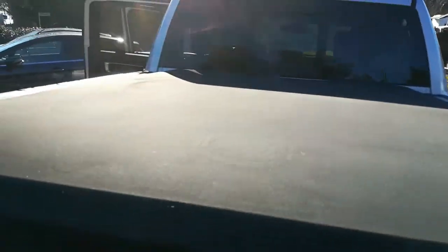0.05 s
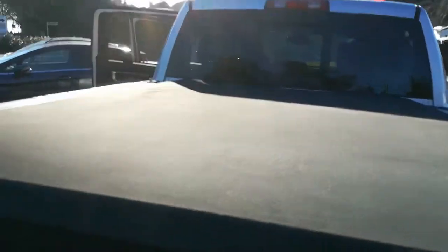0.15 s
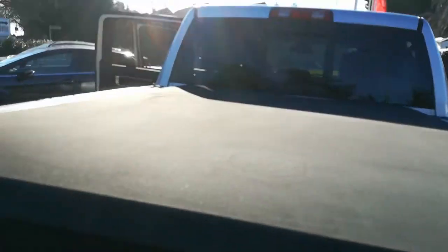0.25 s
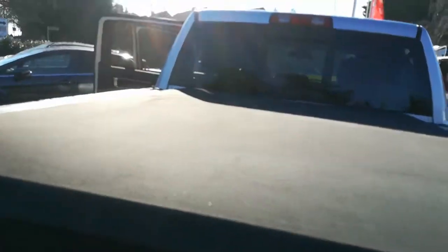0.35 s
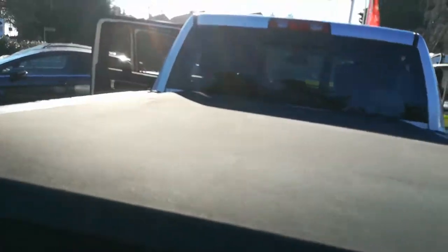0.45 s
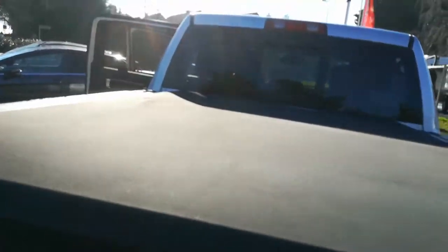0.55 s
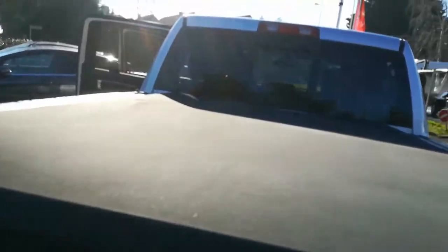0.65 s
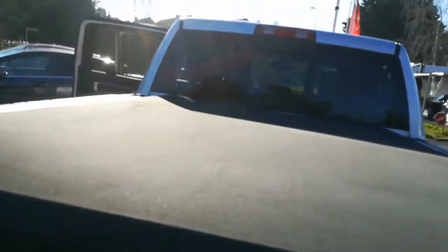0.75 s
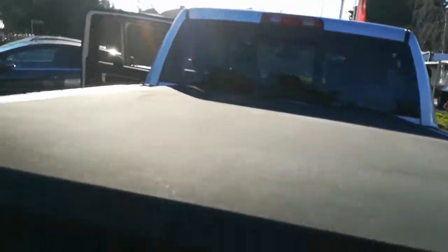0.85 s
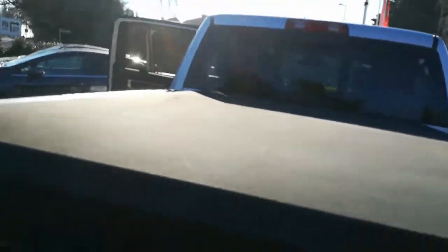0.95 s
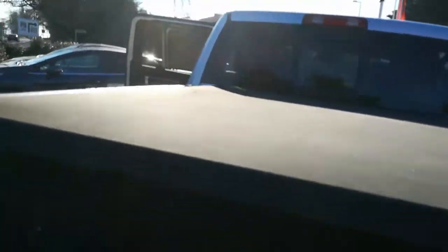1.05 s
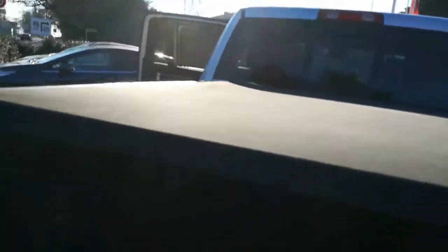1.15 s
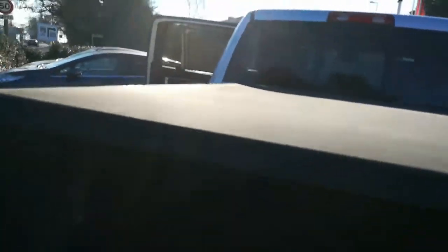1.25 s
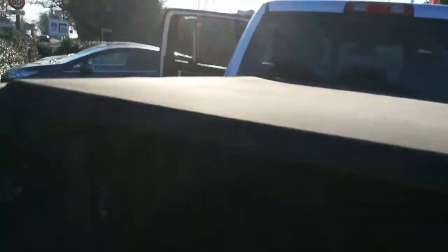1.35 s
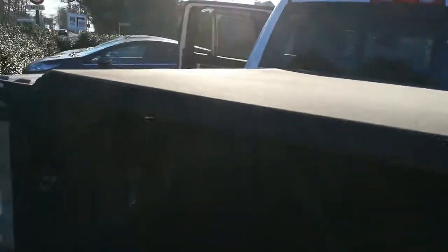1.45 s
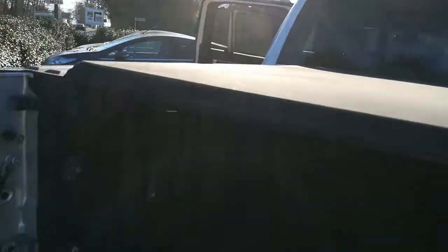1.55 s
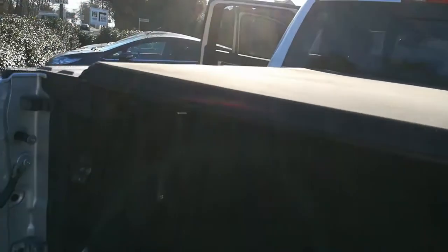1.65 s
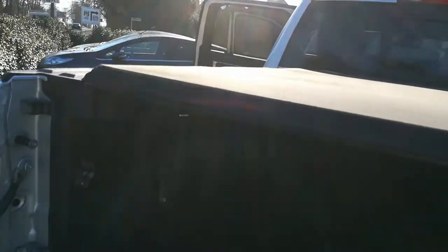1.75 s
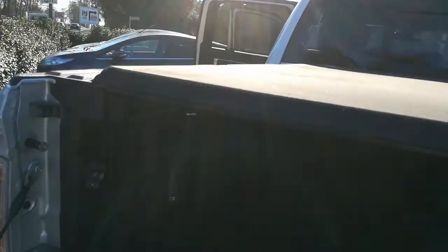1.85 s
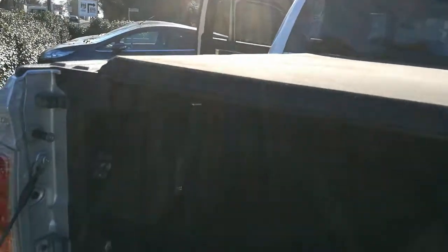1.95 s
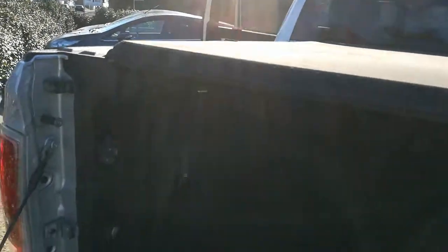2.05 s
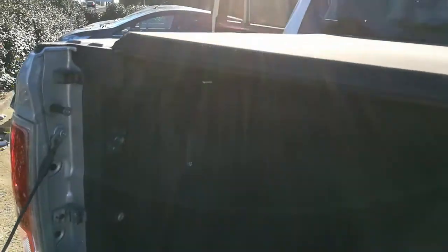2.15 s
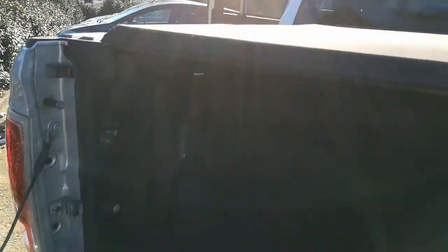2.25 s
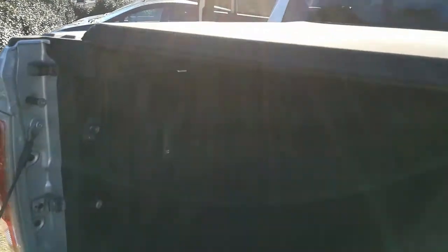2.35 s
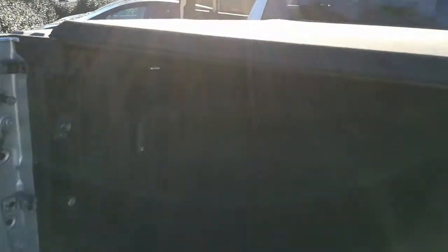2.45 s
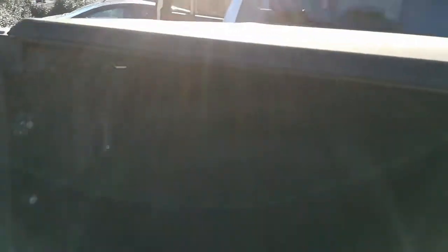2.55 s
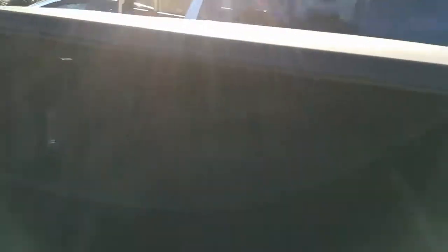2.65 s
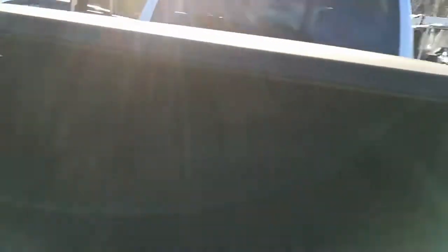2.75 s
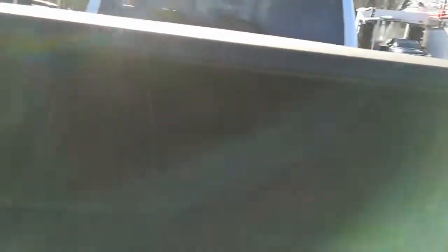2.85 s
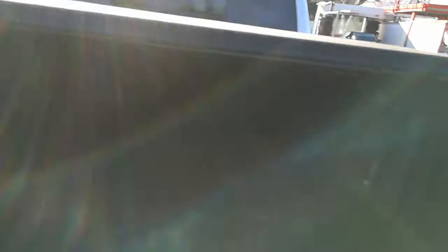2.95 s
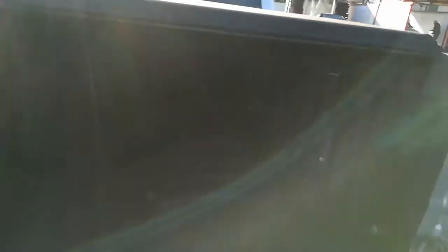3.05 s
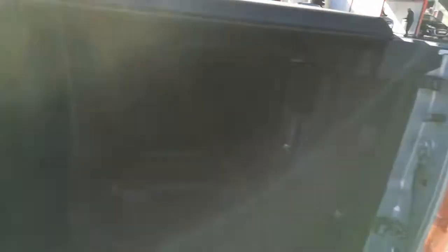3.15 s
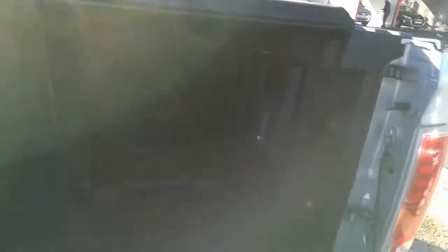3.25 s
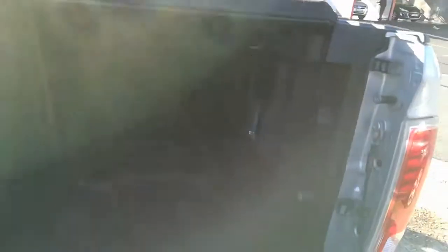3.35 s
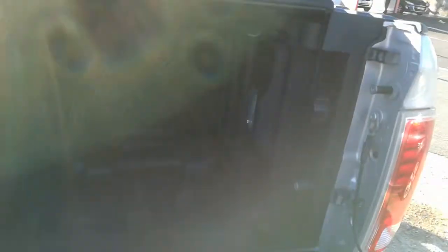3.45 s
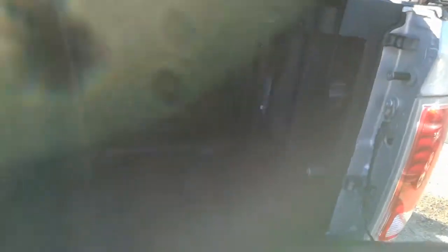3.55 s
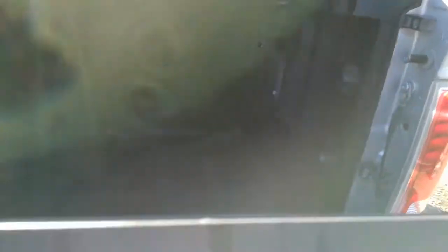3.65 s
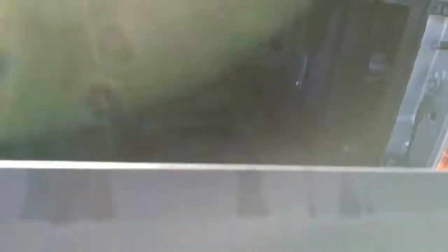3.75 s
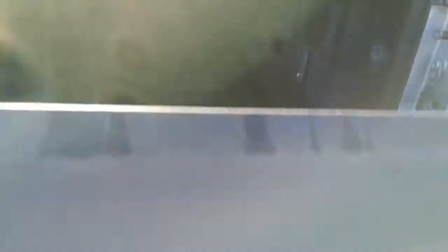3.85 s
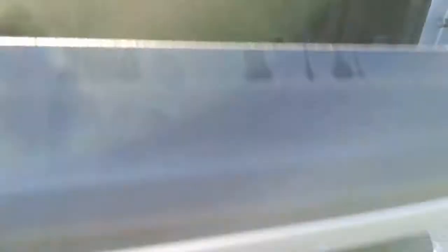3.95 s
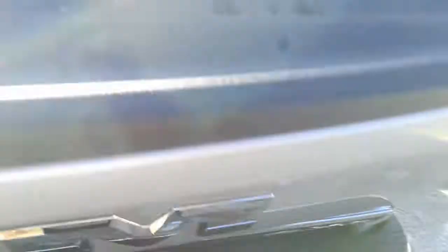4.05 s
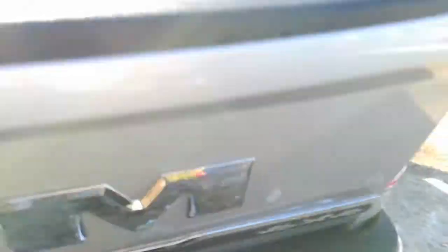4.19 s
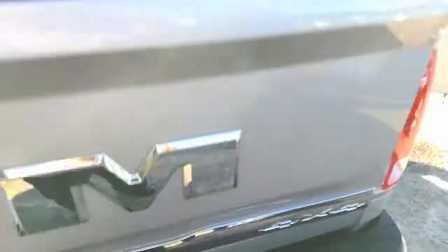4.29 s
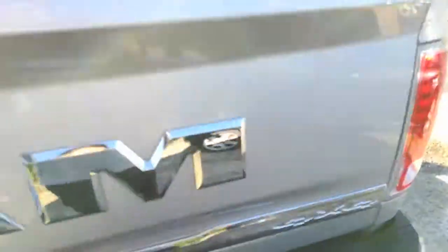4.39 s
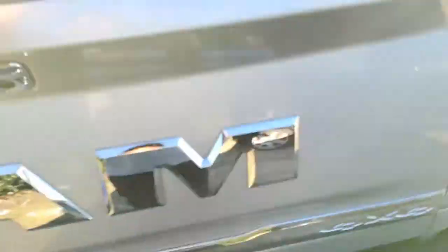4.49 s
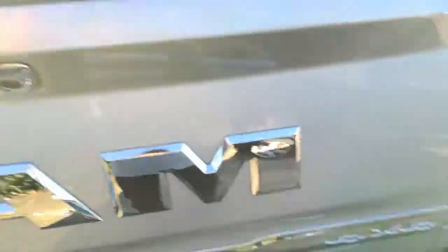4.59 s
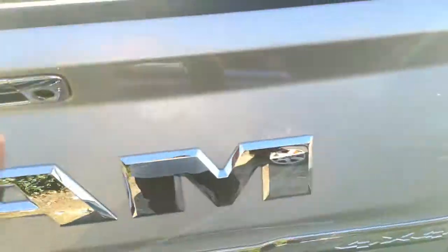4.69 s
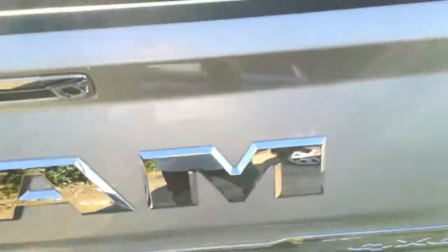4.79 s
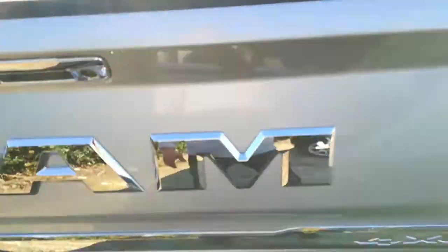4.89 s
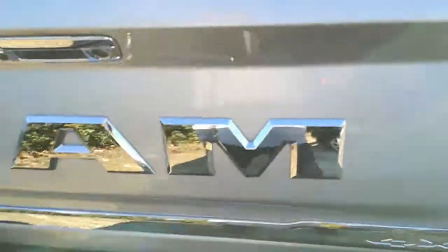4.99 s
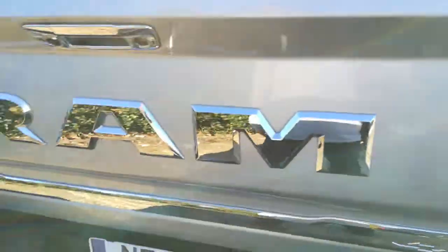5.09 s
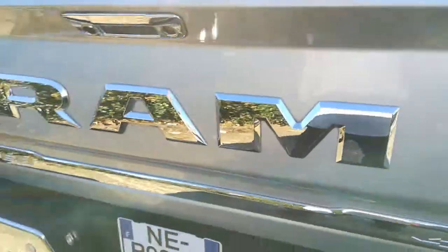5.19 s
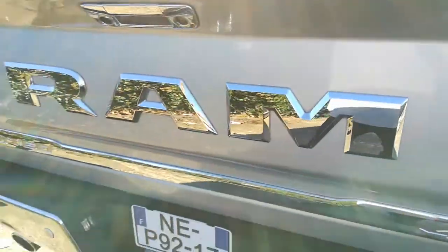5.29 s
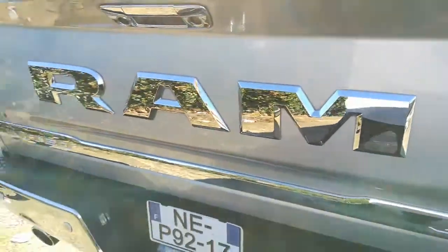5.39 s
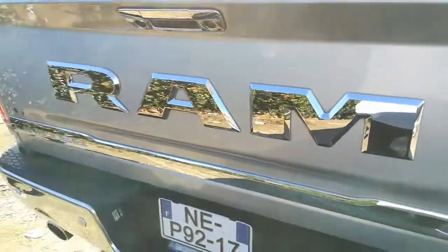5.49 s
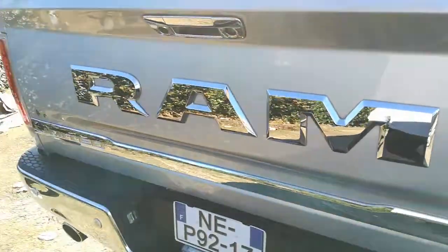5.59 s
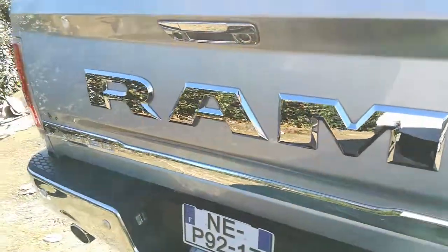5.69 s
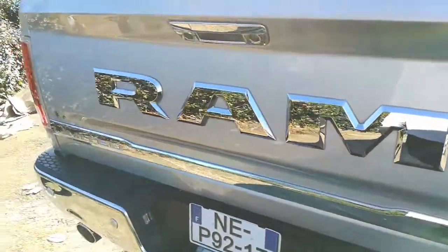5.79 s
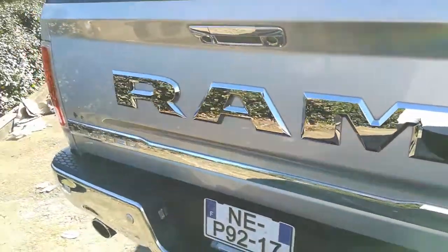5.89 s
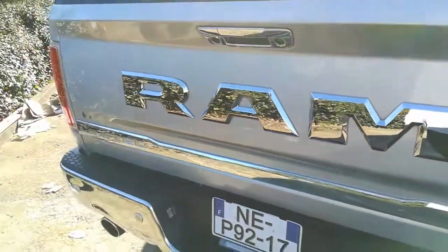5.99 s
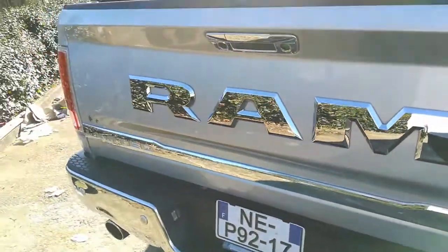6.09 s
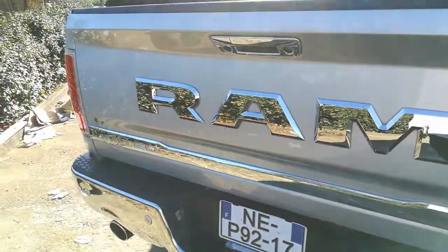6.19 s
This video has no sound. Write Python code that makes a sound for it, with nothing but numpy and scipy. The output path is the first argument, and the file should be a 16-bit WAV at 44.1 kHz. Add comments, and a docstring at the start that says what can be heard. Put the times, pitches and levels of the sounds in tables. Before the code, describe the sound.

A handheld microphone stands right behind a parked truck in open air. For over four seconds there is only faint traffic, hiss, leaf rustle and wind buffeting, then a barely audible hinge scrape and tick. The heavy steel tailgate bangs shut very loudly, its latches cracking in quick succession, panels thudding and ringing briefly. Half a second later the handle clicks lightly, and soft road noise remains.

```python
"""Traffic rumble, tyre roar and airy hiss are heard first, with light gusts, a rustling hedge and a distant
engine whose note climbs slowly. A soft hinge scrape and a faint click lead to the slam of a pickup's tailgate:
stops and latches crack and clatter as noise bursts, steel panels thud and ring as damped modes, and the covered
bed booms as a short low swing. A small click follows.
The background is shaped noise; the engine is a wavering sum of three harmonics."""
import sys
import numpy as np
from scipy import signal
from scipy.fft import rfft, irfft, next_fast_len
from scipy.io import wavfile
from scipy.ndimage import uniform_filter1d, map_coordinates

SR = 44100
rng = np.random.default_rng(int(sys.argv[2]) if len(sys.argv) > 2 else 0)


def waveform_to_disk(signal):
    """Save audio, clipped to [-1, 1], as 16-bit WAV at the path in sys.argv[1]."""
    frames = np.transpose(np.atleast_2d(signal))
    scaled = np.clip(frames, -1, 1) * 32767
    samples = np.round(scaled).astype(np.int16)
    wavfile.write(sys.argv[1], SR, samples)


N = 274743
TIME = np.arange(N) / SR  # s, from the start of the scene
AGE = np.arange(SR) / SR  # s, from the start of a single hit


def amp(db):
    """Level: decibels become an amplitude ratio."""
    return 10 ** (np.asarray(db) / 20)


def unit(x):
    """Normalisation: scale to rms 1."""
    return x / np.sqrt(np.mean(x ** 2) + 1e-20)


def along(points, hz):
    """Logarithmic pitch: read a (frequency, value) curve on a log frequency axis."""
    point_hz, value = np.transpose(points)
    return np.interp(np.log(hz + 1), np.log(point_hz + 1), value)


def curves(rows):
    """Linear interpolation: one value per sample for each column after the time."""
    s, *columns = np.transpose(rows)
    return [np.interp(TIME, s, column) for column in columns]


def wobble(rate, size=N):
    """Random modulation: a smooth curve through random knots, rate of them a second."""
    knots = rng.standard_normal(int(size * rate / SR) + 4)
    return map_coordinates(knots, [TIME[:size] * rate])


def swell(s, half_s):
    """Gaussian envelope: a smooth rise and fall that peaks at time s."""
    return np.exp(-((TIME - s) / half_s) ** 2)


def filtered(x, response):
    """Linear filtering: multiply the spectrum of x by a response of frequency."""
    length = x.shape[-1]
    padded = next_fast_len(length + 8192)
    spectrum = rfft(x, padded) * response(np.fft.rfftfreq(padded, 1 / SR))
    return irfft(spectrum, padded)[..., :length]


def reshaped(x, gain):
    """Time-varying filtering: a gain over frequency and time on the short-time spectrum."""
    hz, t, cells = signal.stft(x, SR, nperseg=256)
    return signal.istft(cells * gain(hz, t), SR)[1][:, :x.shape[1]]


# Correlation of the left and right sound: pitch_hz, correlation (1 is identical, 0 is unrelated)
STEREO_CORRELATION = [(70, 0.98), (160, 0.99), (300, 0.71), (600, 0.033), (1200, 0.13), (2500, 0.0082),
                      (10000, 0.022)]


def noise(spectrum, size):
    """Diffuse-field coherence: coloured noise of rms 1, alike in the bass, nearly unrelated in the treble."""
    def mid_side_response(hz):
        angle = np.arccos(np.clip(along(STEREO_CORRELATION, hz), -1, 1)) / 2
        return amp(along(spectrum, hz)) * [np.cos(angle), np.sin(angle)]

    mid, side = filtered(rng.standard_normal((2, size)), mid_side_response)
    return unit(np.array([mid + side, mid - side]))


def ring(modes, scatter_db, spread_hz):
    """Modal superposition: decaying sines of varied strength, the higher ones out of step left to right."""
    out = np.zeros((2, SR))
    for hz, db, t60 in modes:
        skew = rng.normal() * min(hz / spread_hz, 1) * np.array([[1], [-1]])  # rad
        decay = amp(db + scatter_db * rng.normal() - 60 * AGE / t60)
        out -= decay * np.sin(2 * np.pi * hz * AGE + skew)
    return out


def add(track, s, sound, pan_db=0):
    """Superposition: mix a sound in at time s, pan_db louder on the left than on the right."""
    start = round(s * SR)
    panned = sound * amp([[pan_db / 2], [-pan_db / 2]])
    track[:, start:start + SR] += panned[:, :N - start]


# Metal contacts of stops and latches: start_s, crack_level_db, crack_t60_s, clatter_level_db,
# dull_above_hz, left_over_right_db
METAL_CONTACTS = [(4.362, -12, 0.032, -19.5, 4530, -5), (4.3672, -6, 0.019, -24, 6400, 11.5),
                  (4.3855, -14, 0.032, -19.5, 16000, -4.5), (4.401, -8.5, 0.034, -21.5, 14900, 7.5),
                  (4.4194, -19, 0.031, -27.5, 4500, -11), (4.458, -29, 0.062, -31, 11000, -3),
                  (4.503, -21.5, 0.044, -30, 4200, -2), (4.5602, -31, 0.0044, -62, 14000, -15),
                  (4.571, -42, .03, -40.5, 2400, -9), (4.692, -44, .025, -57, 13900, -7)]
# Colour of the sharp crack: pitch_hz, density_db (per Hz)
CRACK_SPECTRUM = [(200, -5), (500, 4), (700, -32), (1000, -1), (2200, 1), (3200, -17), (4300, 2),
                  (6500, -1.5), (9000, -10.5), (15000, -11)]
# Colour of the sheet-metal clatter: pitch_hz, density_db (per Hz)
CLATTER_SPECTRUM = [(60, -10), (150, 5), (350, -0.5), (520, -5), (700, -5.5), (950, 5), (1500, -4.5),
                    (2400, 2), (3300, -2), (5200, -4.5), (8000, -6), (15000, -21)]
# Decay time of the sheet metal: pitch_hz, t60_s
CLATTER_DECAY = [(100, 0.91), (400, 0.51), (1000, 0.33), (2500, 0.3), (6000, 0.2), (14000, 0.095)]


def latches(rattle_db=2.0):
    """Impact excitation: each contact is a sharp crack with a clatter of countless sheet-metal modes."""
    def steel_damping(hz, t):
        return amp(-60 * t / along(CLATTER_DECAY, hz)[:, None])

    out = np.zeros((2, N))
    onset = 1 - np.exp(-AGE / 0.0009)
    for s, crack_db, crack_t60, clatter_db, dull_hz, pan_db in METAL_CONTACTS:
        crack = amp(crack_db - 60 * AGE / crack_t60) * noise(CRACK_SPECTRUM, size=SR)
        chatter = unit(amp(rattle_db * wobble(300, size=SR)))  # loose parts buzz against each other
        sheet = reshaped(noise(CLATTER_SPECTRUM, size=SR), steel_damping)
        clatter = amp(clatter_db) * chatter * sheet
        # third-order roll-off of the treble
        softened = filtered(crack + clatter, lambda hz: 1 / np.sqrt(1 + (hz / dull_hz) ** 6))
        add(out, s, softened * onset, pan_db)
    return out


# Blows that shake the panels: start_s, ring_level_db, thud_level_db
PANEL_BLOWS = [(4.3615, -14.5, -38), (4.401, -19.5, -19), (4.4208, -19, -13), (4.501, -29.5, -20.5),
               (4.556, -34.5, -23), (4.66, -45, -35.5)]
# Modes of gate and bed: pitch_hz, level_db (relative to the ring level), t60_s
PANEL_MODES = [(92.9, -4, 0.62), (115.2, 7.5, 0.15), (151.3, -7, 0.447), (167.1, -2.5, 0.57),
               (214.4, -5, .42), (235, -14.5, 0.52), (267, -6.5, 0.34), (282.6, -8, 0.33),
               (305.6, -7.5, 0.28), (354.7, -14, .38), (383.6, -14.5, 0.49), (446.6, -15, 0.44),
               (483, -19, .4), (894, -16, .33), (986, -16, 0.26), (1194, -16, 0.24), (1260, -17, 0.17),
               (2200, -25, 0.23), (2454, -14.5, 0.18), (3740, -28, 0.18), (4300, -17, 0.17),
               (5070, -17, .22)]
# Colour of the body thud: pitch_hz, density_db (per Hz)
THUD_SPECTRUM = [(40, -16), (85, -3), (135, 4), (175, 2), (230, -5), (380, -9.5), (600, -33), (1500, -46)]


def panels(thud_t60=0.16):
    """Modal resonance: the weight of the gate thuds into the body and sets the big panels ringing."""
    out = np.zeros((2, N))
    onset = 1 - np.exp(-AGE / 0.0025)
    for s, ring_db, thud_db in PANEL_BLOWS:
        thud = amp(thud_db - 60 * AGE / thud_t60) * noise(THUD_SPECTRUM, size=SR)
        tone = amp(ring_db) * ring(PANEL_MODES, scatter_db=0.5, spread_hz=1200)
        add(out, s, (thud + tone) * onset)
    return out


COVER_HZ, COVER_SWELL_S = 46.5, 0.016  # swing of the soft cover, time to its widest
# The gate shoves the air in the bed as it latches and as it settles: start_s, level_db
AIR_SHOVES = [(4.401, -9.5), (4.557, -21.5)]


def boom():
    """Cavity resonance: air trapped in the bed pumps the soft cover, which swells and soon dies away."""
    out = np.zeros((2, N))
    u = AGE / COVER_SWELL_S
    envelope = u * np.exp(1 - u)
    swing = -envelope * np.cos(2 * np.pi * COVER_HZ * AGE)
    for s, db in AIR_SHOVES:
        add(out, s, amp(db) * swing)
    return out


# Small clicks of the handle: start_s, level_db, left_over_right_db
HANDLE_CLICKS = [(3.764, -41, -2), (5.0346, -20, 1), (5.0424, -30.5, -8)]
# Modes of the handle: pitch_hz, level_db (relative), t60_s
HANDLE_MODES = [(1260, -8, 0.026), (1730, -4, 0.023), (2320, -4, 0.033), (2470, -6.5, 0.046),
                (2590, -8, 0.067), (2880, -25, 0.052), (2950, -12.5, 0.08), (3620, -16, 0.074),
                (5300, -16, .03)]
# Colour of the tick: pitch_hz, density_db (per Hz)
TICK_SPECTRUM = [(300, -33), (700, -32), (1200, 6), (1900, -5), (2550, 8), (3600, -6), (6500, -12),
                 (9000, -17), (15000, -36)]


def handle(tick_db=-2, tick_t60=0.013, echo_db=-21, echo_t60=0.13, ring_db=-5):
    """Two-stage decay: a light plastic part ticks and rings, and the hollow gate answers faintly."""
    out = np.zeros((2, N))
    for s, db, pan_db in HANDLE_CLICKS:
        decay = amp(tick_db - 60 * AGE / tick_t60) + amp(echo_db - 60 * AGE / echo_t60)
        tick = decay * noise(TICK_SPECTRUM, size=SR)
        tone = amp(ring_db) * ring(HANDLE_MODES, scatter_db=1.0, spread_hz=1800)
        add(out, s, amp(db) * (tick + tone), pan_db)
    return out


# Colour of the hinge scrape: pitch_hz, density_db (per Hz)
SCUFF_SPECTRUM = [(800, -28), (2000, -10), (2450, -3), (2900, -10), (4500, -29), (12000, -45)]


def scuff(s=3.52, half_s=0.047, db=-51):
    """Friction noise: the hinge scrapes softly as the gate starts to lift."""
    return amp(db) * swell(s, half_s) * noise(SCUFF_SPECTRUM, size=N)


# Distant engine: start_s, pitch_hz (firing rate), level_db
ENGINE_COURSE = [(0, 72.32, -49.5), (.7, 73.15, -56.5), (1.3, 75, -50.5), (2.6, 81.42, -46.5),
                 (3.15, 85.74, -50.5), (3.7, 86.7, -48.5), (4.8, 90, -53), (5.75, 90.73, -50),
                 (6.23, 85, -71)]


def engine(waver_db=2.0):
    """Harmonic series: an exhaust note of three partials climbs slowly, wavers, and sinks at the end."""
    hz, db = curves(ENGINE_COURSE)
    phase = 2 * np.pi * np.cumsum(hz * (1 + 0.01516 * wobble(11))) / SR
    level = amp(db + waver_db * wobble(7.9)) * np.sqrt(2)  # the fundamental's rms follows db
    return level * (np.sin(phase) + amp(-12.5) * np.sin(2 * phase) + amp(-14.0) * np.sin(3 * phase))


CALM_DB = -52.5  # buffeting between gusts
RUSTLE_DB, RUSTLE_CALM_DB = -53.5, -62.5  # the hedge while the breeze blows, and after it drops
BREEZE_DROPS_S, BREEZE_DROP_LENGTH_S = 1.3, 0.19
# Gusts on the listener: peak_s, half_length_s, level_db
GUST_SWELLS = [(1.285, 0.21, -41), (5.194, .3, -55), (6.12, 0.068, -51.5)]
# Colour of the wind buffeting: pitch_hz, density_db (per Hz)
BUFFET_SPECTRUM = [(12, -18), (28, 4), (70, 6), (120, -7), (300, -32), (800, -75)]
# Colour of the hedge: pitch_hz, density_db (per Hz)
RUSTLE_SPECTRUM = [(500, -17), (1200, -2), (1800, 4.5), (2800, -1), (4000, 6.5), (5200, -12), (9000, -12.5),
                   (15000, -22)]


def breeze():
    """Turbulence noise: weak gusts buffet the listener; the hedge rustles until the breeze drops."""
    push = amp(CALM_DB) + sum(amp(db) * swell(s, half_s) for s, half_s, db in GUST_SWELLS)
    eddies = amp(1.5 * wobble(10))
    blowing = (1 - np.tanh((TIME - BREEZE_DROPS_S) / BREEZE_DROP_LENGTH_S)) / 2
    rustle_db = RUSTLE_CALM_DB + (RUSTLE_DB - RUSTLE_CALM_DB) * blowing
    buffeting = push * eddies * noise(BUFFET_SPECTRUM, size=N)
    return buffeting + amp(rustle_db) * noise(RUSTLE_SPECTRUM, size=N)


def patchy(x, depth_db):
    """Spectral fluctuation: slow random patches of colour drift through a steady noise."""
    def patches(hz, t):
        field = rng.standard_normal((len(hz), len(t)))
        across_pitch = uniform_filter1d(field, size=5, axis=0)
        return amp(depth_db * unit(uniform_filter1d(across_pitch, size=90, axis=1)))

    return reshaped(x, patches)


MIRROR_GROWTH_PER_S = 0.073  # the reflection strengthens as the listener nears the tailgate
# Extra path of the road noise by way of the truck's panels: time_s, path_m
REFLECTION_PATH = [(2.4, 0.28), (3.2, .35), (4.1, 0.23), (4.8, .35), (5.4, 0.31), (6.23, 0.42)]


def mirrored(x):
    """Comb filtering: a sound plus its reflection off the truck, a hollow colour that slides with the path."""
    path_m, = curves(REFLECTION_PATH)
    arrival = TIME - path_m / 343  # speed of sound in m/s
    late = np.array([np.interp(arrival, TIME, side) for side in x])
    return unit(x + MIRROR_GROWTH_PER_S * TIME * late)


# A brighter band in the hiss: time_s, centre_hz, lift_db
BRIGHT_BAND = [(.25, 7050, 4), (.45, 4000, 2.5), (.8, 4420, 7.5), (1, 6800, 3.5), (2.4, 5150, 4),
               (4, 5206, 4), (6.23, 5010, 4)]


def swishing(x, octaves=0.26):
    """Moving formant: a broad bright band wanders through the hiss, then settles."""
    s, centre_hz, lift_db = np.transpose(BRIGHT_BAND)

    def lift(hz, t):
        distance = np.log2((hz[:, None] + 1) / np.interp(t, s, centre_hz))  # octaves from the centre
        return amp(np.interp(t, s, lift_db) * np.exp(-(distance / octaves) ** 2))

    return unit(reshaped(x, lift))


# Level of the low traffic rumble: time_s, level_db
RUMBLE_COURSE = [(0, -48), (1.2, -48.5), (2.2, -51.5), (3.5, -46), (4.3, -48.5), (6.23, -48.5)]
# Colour of the rumble: pitch_hz, density_db (per Hz)
RUMBLE_SPECTRUM = [(13, -27), (25, -9), (80, -5), (112, -9), (162, -8.5), (210, -12.5), (300, -13.5),
                   (410, -21), (600, -34), (1400, -80)]
# Level of the tyre roar, before the stereo tilt: time_s, level_db
ROAD_COURSE = [(0, -52.5), (.8, -51), (1.1, -53.5), (1.4, -50.5), (2.6, -54), (3.25, -52), (4.2, -52.5),
               (5, -56), (6.23, -55)]
# Colour of the tyre roar: pitch_hz, density_db (per Hz)
ROAD_SPECTRUM = [(250, -13), (450, -3), (620, -2.5), (1050, 1), (1600, -5), (2500, -9), (4500, -12.5),
                 (9000, -34.5)]
# Level of the airy hiss, before the stereo tilt: time_s, level_db
HISS_COURSE = [(0, -50), (.8, -51.5), (1.3, -52), (2.2, -52), (3.95, -45), (4.25, -49.5), (5.4, -45.5),
               (6.23, -49)]
# Colour of the hiss: pitch_hz, density_db (per Hz)
HISS_SPECTRUM = [(1200, -38), (2500, -11), (4000, -3), (5200, -4), (6600, -5), (8200, -9.5), (10500, -20.5),
                 (13000, -28), (15800, -37)]


def surroundings():
    """Broadband ambient noise: far traffic as low rumble, tyre roar and an airy hiss."""
    rumble_db, = curves(RUMBLE_COURSE)
    road_db, = curves(ROAD_COURSE)
    hiss_db, = curves(HISS_COURSE)
    rumble = amp(rumble_db + 1.07 * wobble(12)) * noise(RUMBLE_SPECTRUM, size=N)
    road = amp(road_db) * mirrored(patchy(noise(ROAD_SPECTRUM, size=N), depth_db=2.22))
    hiss = amp(hiss_db) * swishing(patchy(noise(HISS_SPECTRUM, size=N), depth_db=2.06))
    return rumble + (road + hiss) * amp([[-1.2], [1.2]])  # stronger on the right


def scene():
    """Superposition: the slam, its clicks and scrape over the surroundings."""
    slam = latches() + panels() + boom()
    return slam + handle() + scuff() + engine() + breeze() + surroundings()


TOP_HZ = 16150  # upper band limit


def record(dry):
    """Saturation and band limiting: the highest peaks are rounded off, and nothing above TOP_HZ is kept."""
    rounded = dry / (1 + dry ** 8) ** (1 / 8)
    return filtered(rounded, lambda hz: np.clip((TOP_HZ - hz) / 500, 0, 1))


dry = scene()
out = record(dry)
waveform_to_disk(out)
```